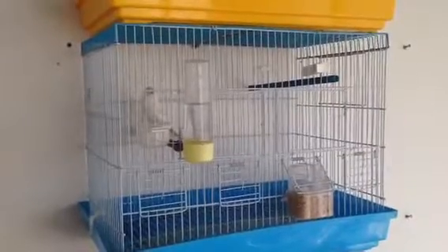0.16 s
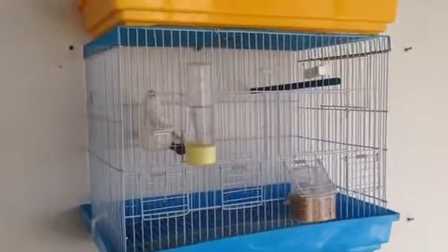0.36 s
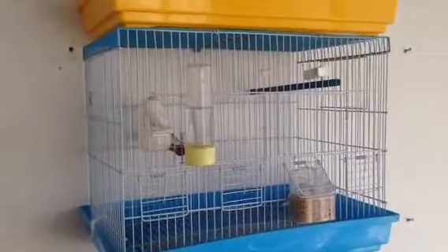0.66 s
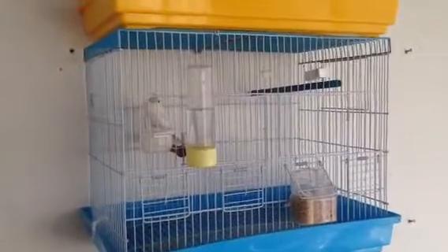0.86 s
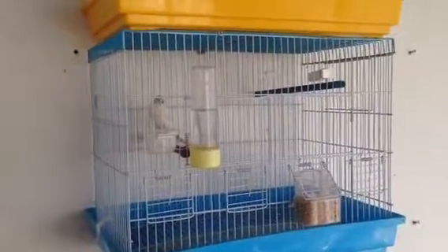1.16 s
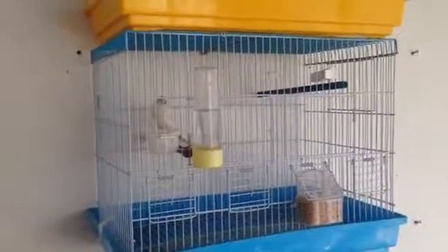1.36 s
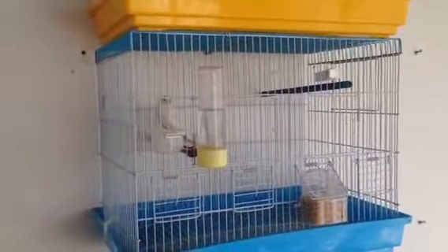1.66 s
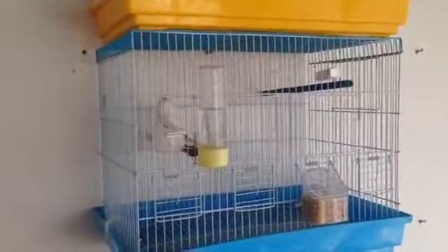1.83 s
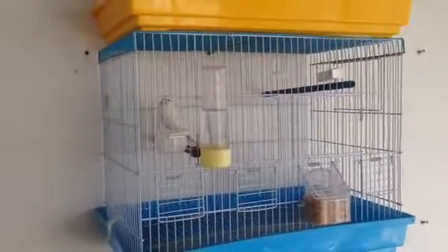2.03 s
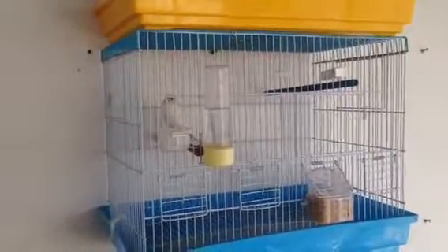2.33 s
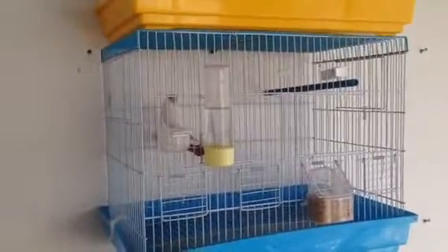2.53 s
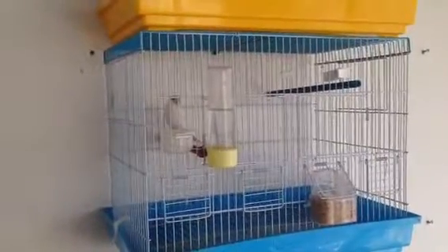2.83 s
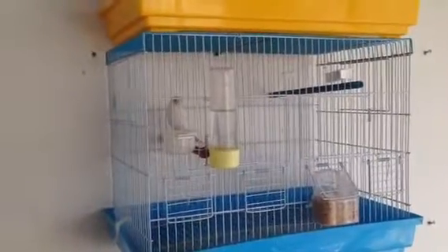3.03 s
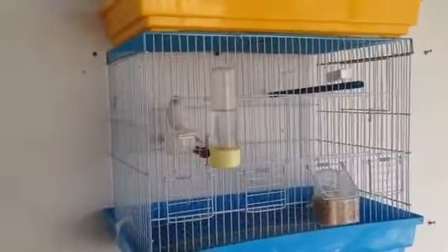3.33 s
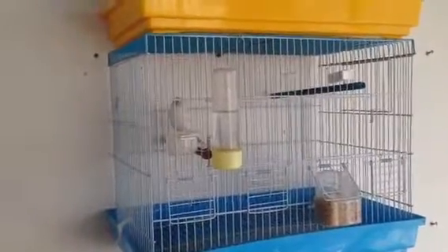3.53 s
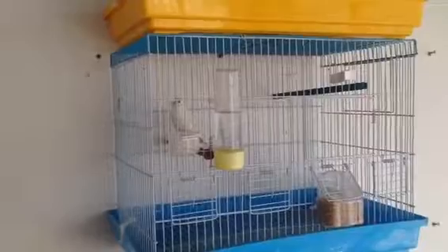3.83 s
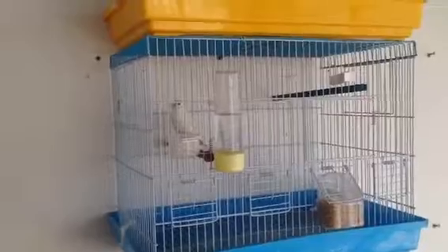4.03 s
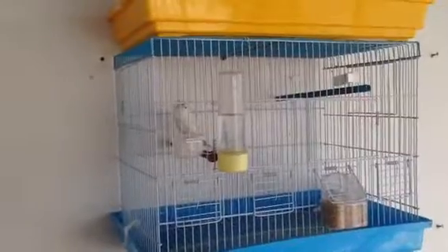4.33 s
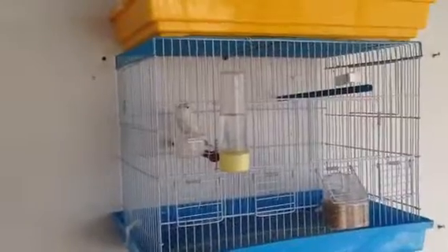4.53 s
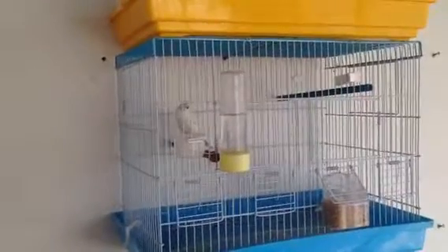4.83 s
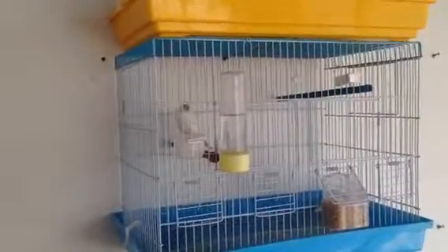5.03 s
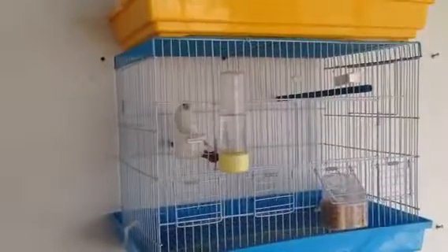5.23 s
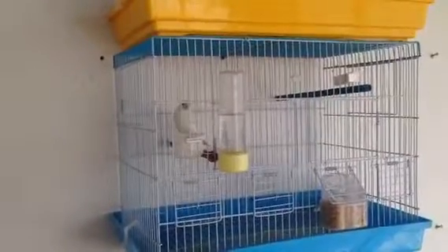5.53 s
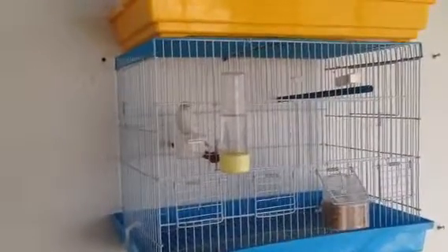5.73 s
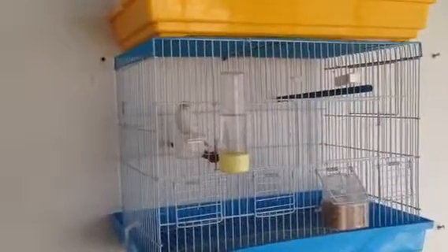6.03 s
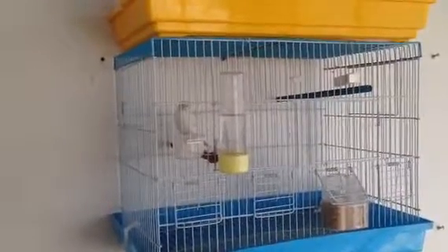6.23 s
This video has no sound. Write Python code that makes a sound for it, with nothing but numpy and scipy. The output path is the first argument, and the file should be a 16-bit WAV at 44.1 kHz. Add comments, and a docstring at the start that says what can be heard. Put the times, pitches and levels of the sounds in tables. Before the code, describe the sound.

Caged canaries sing in a quiet room, rolling quick rising whistles under a repeated loud high note, with raspy chirps between.

```python
"""Canaries sing in a quiet, hard-walled room, each voice a near sine from one side of the syrinx.
One repeats a loud high note, which beats against a second voice and drops to a soft low whistle;
another rolls a long series of rising whistles. Slurs, a sharp chip and raspy chirps fall in between.
Wall reflections colour the song and a few knocks, over a faint hum, room air and a late soft rush."""
import sys
import numpy as np
from scipy import signal
from scipy.fft import rfft, irfft
from scipy.io import wavfile

SR = 44100
rng = np.random.default_rng(int(sys.argv[2]) if len(sys.argv) > 2 else 0)


def generate_wav(signal):
    """Clip the signal to [-1, 1] and save it as 16-bit WAV at the path in sys.argv[1]."""
    frames = np.transpose(np.atleast_2d(signal))
    scaled = np.clip(frames, -1, 1) * 32767
    pcm = np.round(scaled).astype(np.int16)
    wavfile.write(sys.argv[1], SR, pcm)


N = 281358

# loud notes: t/s, f/Hz, level/dB, swell at the head/dB, offset of the second voice/dB
LOUD_NOTES = [(1.988, 2850, -28.5, 8, -2.5), (2.428, 2832, -28.5, 11, -1), (2.872, 2821, -26, 8, -10),
              (3.34, 2802, -26.5, 10.5, -7.5), (3.808, 2826, -26.5, -0.5, -4),
              (4.284, 2845, -27.5, 7.5, -5.5), (4.771, 2837, -31, 10.5, -1)]
# rising whistles of the roll: t/s, length of the climb/s, level of the pip at its top/dB
CLIMBS = [(.008, 0.098, -39), (.158, 0.089, -35), (.298, 0.096, -36), (.435, 0.11, -34), (0.573, .1, -37.5),
          (.726, 0.093, -34.5), (.871, 0.093, -37), (1.003, .11, -37), (1.153, 0.097, -38),
          (1.313, 0.091, -43), (1.512, .1, -37), (1.708, .1, -37), (1.909, .11, -48), (2.106, 0.11, -39),
          (2.312, .11, -44), (2.505, 0.11, -48), (2.709, 0.11, -37.5), (2.924, 0.097, -51),
          (3.13, 0.099, -37.5), (3.328, .105, -31.5), (3.525, 0.1, -36.5), (3.689, 0.1, -33),
          (3.84, 0.094, -37), (3.976, .097, -35.5), (4.122, 0.1, -37), (4.269, 0.093, -37),
          (4.401, 0.11, -37.5), (4.562, .11, -37), (4.722, 0.089, -36)]


def whistle(hz, db, overtones_db, jitter):
    """Self-sustained oscillation of one side of the syrinx: a slightly trembling sine with harmonics."""
    phase = 2 * np.pi * np.cumsum(hz * (1 + jitter * waver(len(hz), 112))) / SR
    tone = np.sin(phase) + sum(amp(d) * np.sin(k * phase) for k, d in enumerate(overtones_db, 2))
    fade = signal.windows.tukey(len(hz), min(250 / len(hz), 1))
    return np.sqrt(2) * amp(db) * tone * fade


def loud_notes(scoop_hz=110, scoop_s=.0076, sag_hz_per_s=220, fade_db_per_s=21.5, accent_db=6.5):
    """Random frequency modulation roughens a held note between its clean head and a last accent."""
    out, t = np.zeros(N), clock(.1332)
    bend = scoop_hz * np.exp(-t / scoop_s) - sag_hz_per_s * t
    body = gate(t, attack_s=.017, release_s=.012) - fade_db_per_s * t
    accent = accent_db * bell(t, .123, .0056)
    jitter = .019 * bell(t, .0754, .029)
    overtones_db = [d - 70 * t for d in (-47, -36, -39)]
    for s, pitch, level, head, _ in LOUD_NOTES:
        db = level + body + accent + head * bell(t, .03, .01)
        add(out, s, whistle(pitch + bend, db, overtones_db, jitter))
    return out


def second_voice(delay_s=.033, edge_db=-20.5, swell_db=17):
    """Beating: the other side of the syrinx slides down through the pitch of each loud note."""
    out, t = np.zeros(N), delay_s + clock(.071)
    ratio = 1.06 - 68 * (t - .038) ** 2
    envelope = edge_db + swell_db * bell(t, .062, .022)
    for s, pitch, level, _, offset in LOUD_NOTES:
        add(out, s + delay_s, whistle(pitch * ratio, level + offset + envelope, [], jitter=.0237))
    return out


def roll(foot_hz=1205, top_hz=1878, level_db=-42, dip_db=8.5, linger=1.393):
    """Frequency sweeps: each whistle climbs an S-curve, thins, then lingers with a brighter octave."""
    out = np.zeros(N)
    for s, length, _ in CLIMBS:
        t = clock(linger * length)
        u = t / length
        climb = 1 - np.exp(-(u / .62) ** 2.574)
        detune, brightness, effort = rng.standard_normal(3)
        hz = (foot_hz + (top_hz - foot_hz) * climb) * (1 + .01098 * detune)
        envelope = gate(t, attack_s=.034, release_s=.015) - dip_db * bell(u, .78, .071)
        octave_db = -20 + 4 * climb + 3 * brightness
        add(out, s, whistle(hz, level_db + 1.3 * effort + envelope, [octave_db, -40], jitter=.013))
    return out


def pips(start_hz=1936, sag_hz_per_s=4000, lead_s=.007):
    """Tone bursts: a short bright accent rings out at the top of each climb."""
    out, t = np.zeros(N), clock(.019)
    hz = start_hz - sag_hz_per_s * t
    envelope = gate(t, attack_s=.0065, release_s=.01)
    for s, length, level in CLIMBS:
        add(out, s + length - lead_s, whistle(hz, level + envelope, [-26], jitter=.015))
    return out


def arches(bend_s=.013, fade_db=5, octave_rise_db=8.5, flutter_db=2.1):
    """Throat resonance favours the octave of these soft, low whistles, whose pitch rises and falls."""
    # whistles: t/s, length/s, top f/Hz, place of the top/length, level/dB, octave/dB re fundamental
    soft_whistles = [(1.147, 0.31, 1047, 0.46, -56.5, -1.5), (1.626, .23, 1135, 0.52, -48, -3),
                     (2.068, 0.26, 1151, 0.52, -52, 0), (2.505, .26, 1155, 0.54, -52, -3.5),
                     (2.946, 0.24, 1155, .5, -49, -3), (3.421, 0.28, 1135, 0.52, -48.5, -4),
                     (3.607, .4, 2032, .52, -55, 4.5), (3.886, .215, 1163, .53, -52, -4),
                     (4.365, 0.25, 1141, .53, -49, -5.5), (4.848, 0.31, 1186, 0.56, -52.5, 4.5),
                     (5.225, .275, 1115, .33, -50.5, 1.5)]
    out = np.zeros(N)
    for s, length, pitch, top_at, level, octave in soft_whistles:
        t = clock(length)
        u = t / length
        arch = np.sin(np.pi * u ** (np.log(.5) / np.log(top_at)))
        ratio = 1 - bend_s / length * (1 - arch) + .0065 * waver(len(t), 19)  # long notes are flatter
        envelope = gate(t, attack_s=.02, release_s=.037) - fade_db * (u - .5)
        db = level + envelope + flutter_db * waver(len(t), 31)
        overtones_db = [octave + octave_rise_db * (u - .5), -11, -22]
        add(out, s, whistle(pitch * ratio, db, overtones_db, jitter=.007))
    return out


def slurs(start_hz=2716, end_hz=1787, settle_s=.043, octave_rise_db=10.5):
    """Exponential relaxation: the pitch settles downward, rough as it glides, while the octave grows."""
    # falling calls: t/s, length/s, level/dB, octave/dB re fundamental
    falls = [(0.817, .27, -47.5, 6), (6.007, 0.23, -46.5, -11)]
    out = np.zeros(N)
    for s, length, level, octave in falls:
        t = clock(length)
        glide = np.exp(-t / settle_s)
        hz = end_hz + (start_hz - end_hz) * glide
        db = level + gate(t, attack_s=.041, release_s=.078)
        octave_db = octave + octave_rise_db * (t / length - .5)
        add(out, s, whistle(hz, db, [octave_db, octave_db - 35], jitter=.0066 + .0092 * glide))
    return out


def long_note():
    """Amplitude modulation: one pure tone swells and dips at a nearly steady pitch."""
    # course of the note: t/s, f/Hz, level/dB
    contour = [(1.32, 2763, -36.5), (1.384, 2674, -31.5), (1.444, 2740, -55), (1.462, 2709, -30.5),
               (1.51, 2728, -27.5), (1.544, 2731, -42), (1.556, 2740, -24), (1.574, 2759, -32),
               (1.602, 2766, -42.5), (1.628, 2717, -39), (1.66, 2690, -43)]
    at, hz, db = np.transpose(contour)
    out, t = np.zeros(N), at[0] + clock(at[-1] - at[0])
    add(out, at[0], whistle(np.interp(t, at, hz), np.interp(t, at, db), [], jitter=.0015))
    return out


def chip(at_s=1.19, level_db=-27, start_hz=3000, peak_hz=4530, end_hz=2383, rise_s=.025, dip_s=.0047):
    """A fast frequency sweep: one sharp, rough call shoots up, thins at the turn and falls."""
    out, t = np.zeros(N), clock(.12)
    up = start_hz + (peak_hz - start_hz) * (t / rise_s) ** 2
    down = end_hz + (peak_hz - end_hz) * bell(t, rise_s, .019)
    db = level_db + gate(t, attack_s=.002, release_s=.07) - 16 * bell(t, rise_s - dip_s, dip_s)
    add(out, at_s, whistle(np.where(t < rise_s, up, down), db, [-38], jitter=.0302))
    return out


def rasps(half_width_hz=400, ripple_db=3, ripple_hz=800, flutter_hz=220):
    """Source and filter: fluttering noise chirps through one throat resonance and smaller side peaks."""
    # raspy chirps: t/s, length/s, level/dB, resonance f/Hz
    chirps = [(0.02, 0.034, -42, 4970), (0.281, 0.029, -43.5, 4550), (0.404, 0.028, -45.5, 5420),
              (1.303, 0.041, -43, 5360), (1.403, 0.042, -46, 5400), (1.514, 0.045, -40.5, 4740),
              (1.621, 0.043, -40, 5270), (1.772, 0.042, -40.5, 5140), (2.892, 0.014, -39.5, 3550),
              (3.269, 0.0074, -51.5, 6400), (3.571, 0.036, -42, 3490), (3.79, 0.045, -46, 6700),
              (3.945, 0.038, -46, 6250), (4.397, 0.027, -38.5, 3100), (6.148, 0.065, -48, 4520),
              (6.266, 0.039, -48, 5700)]
    # spectrum of the noise source: f/Hz, relative level/dB
    spectrum = [(1200, -42), (2400, 8), (3300, 1), (5300, -6), (6500, -9), (8000, -12.5), (10000, -10.5),
                (14000, -21)]
    out = np.zeros(N)
    for s, length, level, centre in chirps:
        size = round((length + .025) * SR)
        resonance = lambda hz: 1 + 4 / (1 + ((hz - centre) / half_width_hz) ** 2)
        side_peaks = lambda hz: amp(ripple_db * np.cos(2 * np.pi * (hz - centre) / ripple_hz))
        hiss = noise(size, lambda hz: amp(read(spectrum, hz)) * resonance(hz) * side_peaks(hz))
        flutter = 1 + .51 * waver(size, flutter_hz)
        add(out, s - .008, amp(level) * unit(hiss * flutter) * np.hanning(size))
    return out


def knocks(q=7.8, attack_s=.00057):
    """Damped resonance: each dull bump in the room is a dying burst of noise around one frequency."""
    # bumps: t/s, level/dB, resonance f/Hz, decay time constant/s
    bumps = [(.05, -53, 214, 0.068), (0.206, -45, 1450, 0.007), (.36, -46, 512, 0.039),
             (.69, -46.5, 675, 0.033), (.765, -47.5, 853, 0.072), (.815, -36.5, 1480, .012),
             (1.18, -52, 427, 0.018), (1.785, -53, 494, 0.14), (3.312, -40, 427, 0.0066),
             (3.33, -57, 607, 0.063), (4.23, -48, 445, 0.015), (5.53, -46.5, 760, 0.047),
             (5.556, -47, 260, 0.069)]
    out, t = np.zeros(N), clock(.5)
    for s, level, centre, decay in bumps:
        body = noise(len(t), lambda hz: 1 / np.hypot(1, q * (hz / centre - centre / (hz + 1))))
        add(out, s, amp(level) * body * np.exp(-t / decay) * (1 - np.exp(-t / attack_s)))
    return out


def room(x, wet_db, gap_s=.012, reflections_per_s=4000):
    """Reverberation: direct sound, echoes of the nearest walls and a diffuse tail losing treble first."""
    # early reflections: delay t/s, gain re direct sound
    echoes = [(.0034, .3), (.0071, -0.51), (0.0113, .3), (0.0164, 0.32)]
    # reverberation time: f/Hz, T60/s
    t60 = [(300, 0.37), (1200, 0.26), (2800, 0.36), (5000, 0.27), (12000, 0.23)]
    taps = rng.standard_normal(SR) * (rng.random(SR) < reflections_per_s / SR)
    taps *= np.arange(SR) > gap_s * SR
    hz, t, bands = signal.stft(taps, SR, nperseg=256)
    tail = signal.istft(bands * amp(-60 * t / read(t60, hz)[:, None]), SR, nperseg=256)[1]
    response = amp(wet_db) * tail / np.linalg.norm(tail)
    response[0] += 1
    for delay, gain in echoes:
        response[round(delay * SR)] += gain
    return signal.fftconvolve(x, response / np.linalg.norm(response))[:N]


def rush(flutter_db=2.4):
    """Band-limited noise: a soft, fluttering rush that swells late."""
    # envelope: t/s, level/dB
    swell = [(5.5, -58), (5.55, -53), (5.7, -50.5), (5.9, -53), (6.05, -45.5), (6.38, -49.5)]
    # spectrum: f/Hz, relative level/dB
    spectrum = [(300, -48), (600, -4), (900, 2), (1500, -1.5), (2000, 6.5), (2450, 8), (3000, -6),
                (4500, -18.5), (8000, -30)]
    return amp(follow(swell) + flutter_db * waver(N, 51)) * noise(N, lambda hz: amp(read(spectrum, hz)))


def hum(hum_hz=76, octave_db=-73, whine_hz=15000, whine_db=-69):
    """Tonal noise: a low hum and its octave waver in pitch and strength under a thin, steady whine."""
    # envelope of the fundamental: t/s, level/dB
    swell = [(0, -72), (.3, -60), (.8, -61), (1.3, -69), (2, -74), (4.4, -72.5), (5.8, -63.5), (6.38, -65)]
    phase = 2 * np.pi * np.cumsum(hum_hz + 1.027 * waver(N, 2.68)) / SR
    drone = amp(follow(swell)) * np.sin(phase) + amp(octave_db) * np.sin(2 * phase)
    whine = amp(whine_db) * np.sin(2 * np.pi * whine_hz * np.arange(N) / SR)
    return np.sqrt(2) * (drone * (1 + .49 * waver(N, 4.3)) + whine)


def air(level_db=-53, swell_db=1.43):
    """The noise floor: broadband room air and hiss, drifting gently in level."""
    # spectral density: f/Hz, relative level/dB
    spectrum = [(20, -34), (45, -3.5), (60, -4), (90, -9.5), (125, 2.5), (200, -6), (340, -11), (520, -1.5),
                (900, -5), (1400, -11.5), (3000, -12), (6000, -20.5), (10000, -20.5), (15300, -13)]
    return amp(level_db + swell_db * waver(N, 3.8)) * noise(N, lambda hz: amp(read(spectrum, hz)))


def noise(size, colour):
    """Spectral shaping: noise of rms 1 whose relative gain is colour(hz)."""
    return unit(irfft(rfft(rng.standard_normal(size)) * colour(np.fft.rfftfreq(size, 1 / SR)), size))


def waver(size, rate_hz):
    """Random modulation: low-passed noise of rms about 1."""
    return noise(SR + size, lambda hz: 1 / (1 + (hz / rate_hz) ** 4))[:size]


def gate(t, attack_s, release_s):
    """Attack, hold and release, in dB."""
    return 20 * np.log10(np.clip(t / attack_s, .001, 1) * np.clip((t[-1] - t) / release_s, .001, 1))


def bell(t, at, width):
    """A Gaussian bump of height 1."""
    return np.exp(-((t - at) / width) ** 2 / 2)


def read(points, hz):
    """Interpolation on a log-frequency axis."""
    f, value = np.transpose(points)
    return np.interp(np.log(hz + 1), np.log(f + 1), value)


def follow(points):
    """Interpolation in time over the whole scene."""
    return np.interp(np.arange(N) / SR, *np.transpose(points))


def clock(length):
    """Sample times over length seconds."""
    return np.arange(0, length, 1 / SR)


def amp(db):
    """Decibels to gain."""
    return 10 ** (np.asarray(db) / 20)


def unit(x):
    """Normalisation to rms 1."""
    return x / np.sqrt(np.mean(x ** 2) + 1e-20)


def add(mix, s, sound):
    """Superposition: mixes a sound in at s seconds."""
    part = mix[max(round(s * SR), 0):][:len(sound)]
    part += sound[:len(part)]


def scene():
    """Reverberation: loud notes, pips, slurs and the long note sound drier, other calls more echoing."""
    drier = room(loud_notes() + pips(), wet_db=-10) + room(slurs() + long_note(), wet_db=-7)
    wetter = room(roll(), wet_db=-1.5) + room(arches(), wet_db=-3)
    wetter += room(chip() + second_voice(), wet_db=-1) + room(rasps() + knocks(), wet_db=-1.5)
    return (drier + wetter + air() + rush() + hum())[None]


def record(dry):
    """Band limiting: a steep low-pass filter removes the highest treble."""
    low_pass = signal.firwin(801, cutoff=15350, window=("kaiser", 10), fs=SR)
    return signal.oaconvolve(dry, low_pass[None], "same")


dry = scene()
out = record(dry)
generate_wav(out)
```